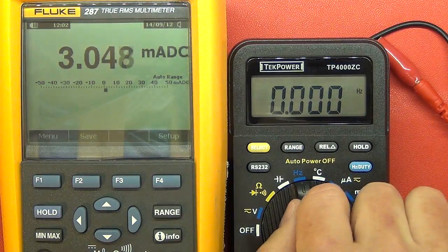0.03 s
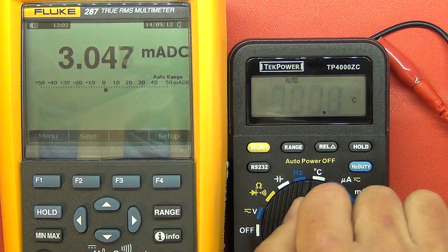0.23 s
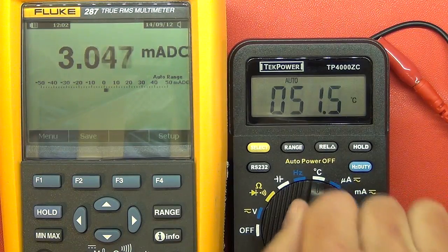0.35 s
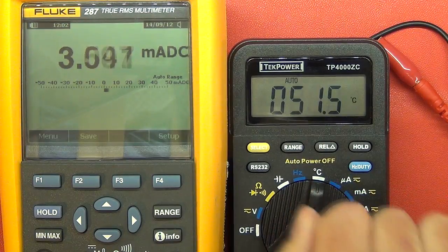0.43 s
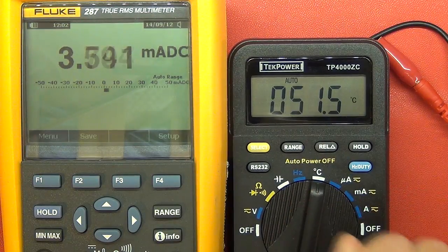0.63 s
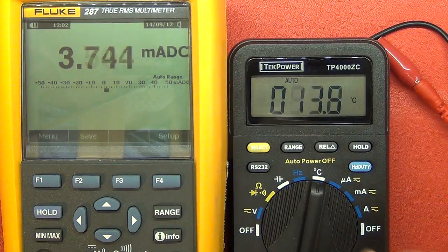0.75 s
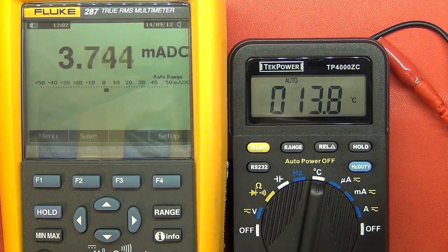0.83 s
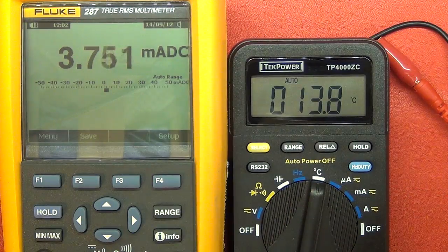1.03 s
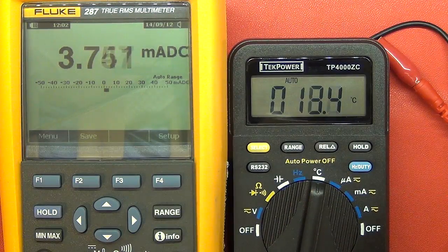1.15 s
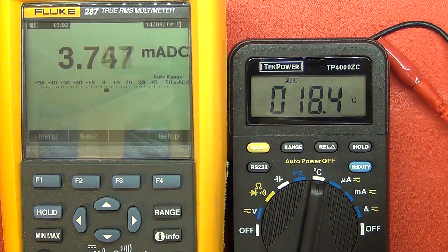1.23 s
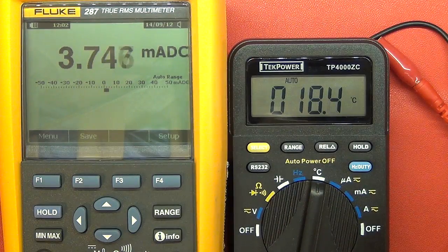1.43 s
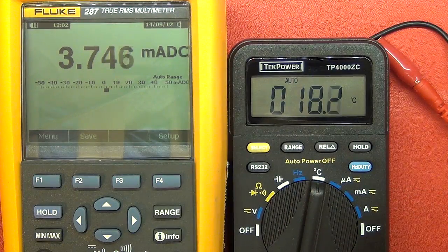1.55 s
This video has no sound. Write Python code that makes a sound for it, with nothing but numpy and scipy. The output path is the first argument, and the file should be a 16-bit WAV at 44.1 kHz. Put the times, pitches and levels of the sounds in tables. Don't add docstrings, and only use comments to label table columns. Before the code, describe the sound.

A meter's rotary knob snaps sharply into its notch, with a brief metallic ring and small-room reflections; a soft knock follows as the finger leaves, then tiny ticks, over quiet hum and hiss, closely miked.

```python
import sys
import numpy as np
from scipy import signal
from scipy.io import wavfile

SR = 44100
rng = np.random.default_rng(int(sys.argv[2]) if len(sys.argv) > 2 else 0)


def magnitude_from_level(level_db):
    exponent = np.asarray(level_db, float) / 20
    return 10 ** exponent


def inscribe(sig):
    pcm = np.round(np.clip(np.atleast_2d(sig).T, -1, 1) * 32767)
    wavfile.write(sys.argv[1], SR, pcm.astype(np.int16))


N = 70560

# (time [s], peak level [dB])
SNAP_CONTACTS = [
    (0.2127, -18),
    (0.2131, -8),
    (0.2138, -13),
    (0.2151, -18),
    (0.2170, -15),
    (0.2202, -20),
]
# (pitch [Hz], level [dB], time to fall 60 dB [s])
NOTCH_MODES = [(2284, -18, 0.025), (3560, -8, 0.0051), (4320, -5, 0.0038), (6530, -4.5, 0.0056),
               (8400, -3, 0.0029), (9270, -6.5, 0.009), (11500, -4, 0.0026), (14600, -6.5, .002)]
# (level [dB],
# time to fall 60 dB [s])
METAL_HZ = [550, 1030, 1497, 1555, 2253, 2420, 2506, 2761, 3322, 3404, 3835, 4231, 4607, 6160]
METAL_RINGS = [(-44, 0.32), (-57, 1.97), (-51.5, 0.66), (-56, 1), (-52, 0.35), (-53, .4), (-50, 0.35),
               (-52, 0.92), (-56, 1.3), (-63, .5), (-55, 0.97), (-60, 0.27), (-59, 1.3), (-43, 0.39)]
# (time [s], level [dB], brightness [dB])
CREEP = [
    (0.1866, -80, -2),
    (0.1874, -41, -2),
    (0.191, -44, -3),
    (0.195, -45, -8),
    (0.2, -47, -14),
    (0.205, -46, -7),
    (0.209, -42, -3),
    (0.2105, -52, 2),
    (0.2130, -52, 3),
]
# (pitch [Hz], level [dB], time to fall 60 dB [s])
SHAFT_MODES = [(578, -4.5, 0.018), (1144, 0.5, 0.02), (1910, 0, 0.011), (2560, 4, 0.0066), (3530, 8, .005)]
# (time [s], low level [dB], bright level [dB])
KNOCKS = [
    (0.2135, -45, -62),
    (0.2240, -34.5, -60),
    (0.4613, -37, -43),
    (0.5194, -58, -56),
]
# (pitch [Hz], level [dB], time to fall 60 dB [s])
CASE_MODES = [(554, -5, 0.11), (640, -8, 0.05), (772, -13, 0.12), (1100, -3, 0.011), (1920, -8, .04),
              (2014, -9, 0.066), (2600, -2, 0.0052)]
# (time [s], peak level [dB], pitch [Hz])
TICKS = [(0.2078, -41, 8300), (0.4613, -47, 8100), (0.636, -52, 10000), (1.3720, -47, 8800),
         (1.3871, -27, 8400), (1.4148, -53, 10000), (1.4200, -49, 8000), (1.4219, -25, 6600),
         (1.4275, -44, 6200), (1.4280, -45, 10500), (1.5022, -49, 10500), (1.5200, -46, 8300)]
TICK_MODES = [5040, 6070, 7200, 8600, 9840, 11400, 12900, 14800]
# (pitch [Hz], time to fall 60 dB [s])
ROOM_T60 = [(300, 0.5), (800, 0.27), (2000, .33), (5000, 0.32), (10000, 0.25), (15000, 0.16)]
# (pitch [Hz], likeness [0-1])
ROOM_LIKENESS = [(60, 0.98), (380, 0.97), (2380, 0.8), (15000, 0.71)]
# (pitch [Hz], level [dB])
SNAP_COLOUR = [(330, -32), (520, -14.5), (1550, -14.5), (2300, -3.5), (3200, -9), (4200, -7), (8500, -4.5),
               (15500, -9)]
# (pitch [Hz], level [dB])
HISS_COLOUR = [(15, -39), (25, -25), (92, -3.5), (451, -8), (1070, -10), (2160, -16.5), (2840, -19),
               (4870, -18.5), (16000, -22)]
# (pitch [Hz], likeness [0-1])
HISS_LIKENESS = [(60, 0.67), (240, 0.94), (950, 0.34), (3770, 0.57), (15000, 0.99)]
# (pitch [Hz], level [dB], width [Hz])
HUM = [(53.4, -71.5, 4.1), (95.8, -68.5, 11.5), (201, -84.5, 10)]
# (pitch [Hz], level [dB], width [Hz])
RATTLE = [(1907, -78, 55), (2342, -79, 50), (2576, -77.5, 33), (2830, -71.5, 104), (3507, -76, 60),
          (3555, -77.5, 150), (3760, -74, 49)]
# (time [s], level [dB])
RATTLE_SWELL = [(0, 0), (0.051, 1), (0.089, -6), (.14, -0.5), (.6, -0.5), (.65, -7.5), (.7, 3.5), (.75, -3),
                (.8, 0.5), (1., 0), (1.03, -6.5), (1.1, 1.5), (1.14, -2), (1.18, 1), (1.25, -4.5),
                (1.33, 1), (1.47, -0.5), (1.6, 0)]

CREEP_SLIPS_PER_S = 6000
BENCH_ECHO_S, BENCH_ECHO_DB = 0.0008, -3
TICK_T60_S, TICK_SLOPE_DB_PER_OCTAVE = 0.0022, 20
TICK_TAIL_DB, TICK_TAIL_T60_S = -29.5, 0.067
THUMP_S, THUMP_HZ, THUMP_DB, THUMP_T60_S = 0.236, 141, -38.5, 0.073
ROOM_RISE_S, ROOM_PATCHY_DB = 0.00096, 2.2
SNAP_WET_DB, CASE_WET_DB, TICK_WET_DB = -15, -42, -48
HISS_DB = -60.5
WHINE_HZ, WHINE_DB = 15625, -86
RATTLE_PER_S, RATTLE_THROB_DB, RATTLE_PATCHY_DB = 30, 4.5, -1.8
PAN_DB, ROOM_PAN_DB, HISS_PAN_DB = -1.94, -1.5, -1.83
CUTOFF_HZ, HISS_CUT_HZ = 16950, 16050


def clicks(s, db):
    out = np.full(N, 1e-18)
    np.add.at(out, (np.asarray(s) * SR).astype(int), magnitude_from_level(db))
    return out


def ring(x, hz, t60):
    r = magnitude_from_level(-60 / (t60 * SR))
    w = 2 * np.pi * hz / SR
    return signal.lfilter([0, np.sin(w)], [1, -2 * r * np.cos(w), r * r], x)


def body(x, modes):
    return sum((-1) ** k * magnitude_from_level(db) * ring(x, hz, t60) for k, (hz, db, t60) in enumerate(modes))


def snap():
    s, db = np.transpose(SNAP_CONTACTS)
    out = 0
    for k, (hz, level, t60) in enumerate(NOTCH_MODES):
        hits = clicks(s, db + rng.normal(0, 0.74, len(s)))
        out = out + (-1) ** k * magnitude_from_level(level) * ring(hits, hz, t60)
    return out


def metal_parts():
    modes = [(hz, *mode) for hz, mode in zip(METAL_HZ, METAL_RINGS)]
    return body(clicks([SNAP_CONTACTS[1][0]], [0]), modes)


def creep():
    t = np.arange(N) / SR
    when, creep_db, bright_db = np.transpose(CREEP)
    slips = (rng.random(N) < CREEP_SLIPS_PER_S / SR) * rng.standard_normal(N)
    slips = slips * magnitude_from_level(np.interp(t, when, creep_db, -200, -200))
    slips = signal.lfilter([0.4], [1, -0.6], slips)
    bright = slips * magnitude_from_level(np.interp(t, when, bright_db))
    return magnitude_from_level(-7.5) * body(slips, SHAFT_MODES) + body(bright, NOTCH_MODES)


def knocks():
    s, low_db, bright_db = np.transpose(KNOCKS)
    return body(clicks(s, low_db), CASE_MODES) + body(clicks(s, bright_db), NOTCH_MODES)


def bench_thump():
    top = ring(clicks([THUMP_S], [THUMP_DB]), THUMP_HZ, THUMP_T60_S)
    return ring(top, THUMP_HZ * 0.766, THUMP_T60_S) / 200


def ticks():
    out = 0
    for s, db, hz in TICKS:
        hit = clicks([s, s + BENCH_ECHO_S], [db, db + BENCH_ECHO_DB])
        modes = [(mode, -TICK_SLOPE_DB_PER_OCTAVE * abs(np.log2(mode / hz)), TICK_T60_S)
                 for mode in TICK_MODES]
        out = out + body(hit, modes)
    out = signal.sosfilt(signal.butter(2, 4300, "high", fs=SR, output="sos"), out)
    t = np.arange(SR // 8) / SR
    fade = magnitude_from_level(TICK_TAIL_DB - 60 * t / TICK_TAIL_T60_S) * (t > BENCH_ECHO_S)
    return out + signal.fftconvolve(out, rng.standard_normal(len(t)) * fade)[:N]


def rms_one(x):
    return x / np.sqrt(np.mean(x ** 2) + 1e-20)


def at_hz(points, hz):
    pitches, values = np.array(points)[:, 0], np.array(points)[:, 1]
    return np.interp(np.log(hz), np.log(pitches), values)


def pan(db):
    return magnitude_from_level(np.array([[db], [-db]]))


def drift(rate):
    r = np.exp(-80 * np.pi * rate / SR)
    noise = rng.standard_normal(N // 40 + 2002)
    slow = signal.lfilter([1], [1, -2 * r, r * r], noise)[2000:]
    return np.interp(np.arange(N) / 40, np.arange(len(slow)), rms_one(slow))


def bands(likeness, gain):
    edges = 22 * 2 ** np.arange(0, 9.7, 1 / 3)
    white = rng.standard_normal((2, 2, N))
    out = 0
    for k, (low, high) in enumerate(zip(edges, edges[1:])):
        band = signal.butter(2, [low, high], "band", fs=SR, output="sos")
        mid, side = signal.sosfilt(band, white[k % 2])
        hz = np.sqrt(low * high)
        alike = np.clip(at_hz(likeness, hz), 0, 1)
        stereo = np.sqrt(1 + alike) * mid + np.sqrt(1 - alike) * side * [[1], [-1]]
        out = out + gain(hz) * stereo
    return out


def room(x, colour):
    t = np.arange(N) / SR
    rise = 1 - np.exp(-t / ROOM_RISE_S)

    def gain(hz):
        fall_db = 60 * t / at_hz(ROOM_T60, hz)
        return rise * magnitude_from_level(at_hz(colour, hz) + ROOM_PATCHY_DB * drift(40) - fall_db)

    reply = bands(ROOM_LIKENESS, gain)
    return pan(ROOM_PAN_DB) * signal.fftconvolve(reply, x[None], axes=1)[:, :N]


def narrow(hz, width_hz):
    return rms_one(ring(rng.standard_normal(N), hz, np.log(1000) / np.pi / width_hz))


def fan_rattle():
    t = np.arange(N) / SR
    turn = np.cumsum(RATTLE_PER_S * (1 + 0.14 * drift(2.93))) / SR
    when, swell_db = np.transpose(RATTLE_SWELL)
    shared_db = RATTLE_THROB_DB * np.cos(2 * np.pi * turn) + RATTLE_PATCHY_DB * drift(8.6)
    shared_db = shared_db + np.interp(t, when, swell_db)
    return sum(magnitude_from_level(db + shared_db + 0.89 * drift(8.7)) * narrow(hz, width) for hz, db, width in RATTLE)


def mains_hum():
    whine = magnitude_from_level(WHINE_DB) * np.sin(2 * np.pi * WHINE_HZ * np.arange(N) / SR)
    return sum(magnitude_from_level(db) * narrow(hz, width) for hz, db, width in HUM) + whine


def hiss_and_rumble():
    noise = bands(HISS_LIKENESS, lambda hz: magnitude_from_level(at_hz(HISS_COLOUR, hz) + 1.0 * drift(4.5)))
    return magnitude_from_level(HISS_DB) * rms_one(noise)


def cut(x, hz):
    return signal.sosfilt(signal.ellip(10, 0.5, 70, hz - 150, fs=SR, output="sos"), x)


def scene():
    small = ticks()
    case = knocks() + creep()
    wet = room(clicks([SNAP_CONTACTS[1][0]], [SNAP_WET_DB]), SNAP_COLOUR)
    wet += room(magnitude_from_level(CASE_WET_DB) * case + magnitude_from_level(TICK_WET_DB) * small, [(300, 0.014), (16000, 0.0051)])
    background = pan(HISS_PAN_DB) * (hiss_and_rumble() + mains_hum() + fan_rattle())
    duller = pan(PAN_DB) * (metal_parts() + case + bench_thump()) + wet + background
    return pan(PAN_DB) * (snap() + small) + cut(duller, HISS_CUT_HZ)


def band_limit(x):
    return signal.sosfilt(signal.butter(12, 16980, fs=SR, output="sos"), x)


def record(dry):
    return band_limit(cut(dry, CUTOFF_HZ))


dry = scene()
out = record(dry)
inscribe(out)
```